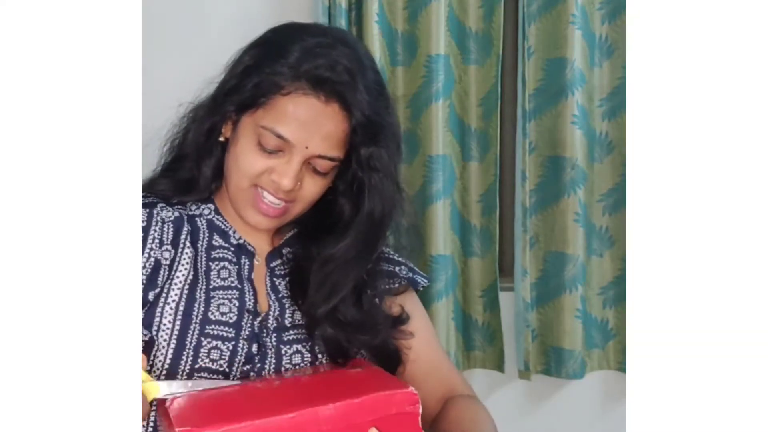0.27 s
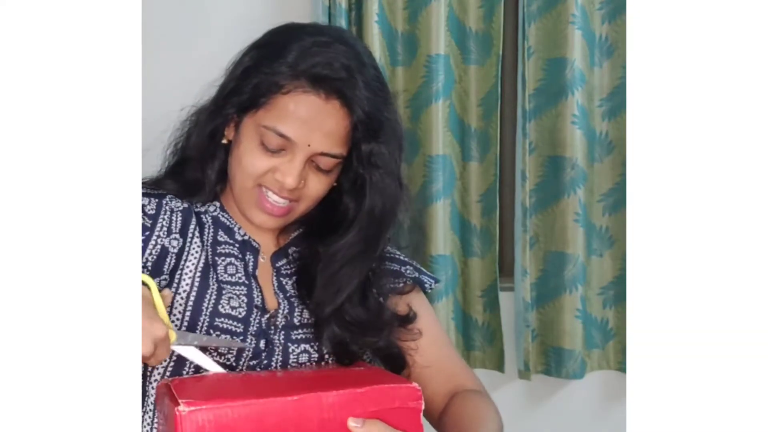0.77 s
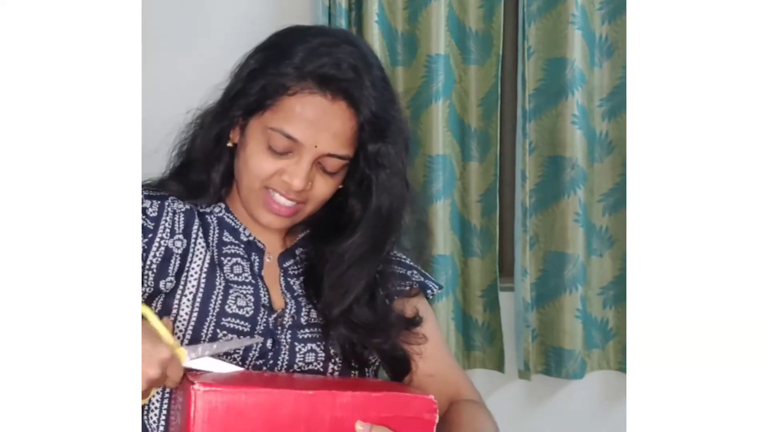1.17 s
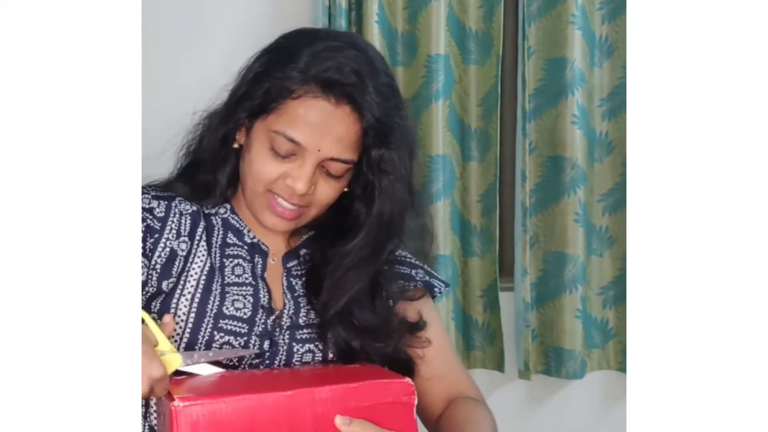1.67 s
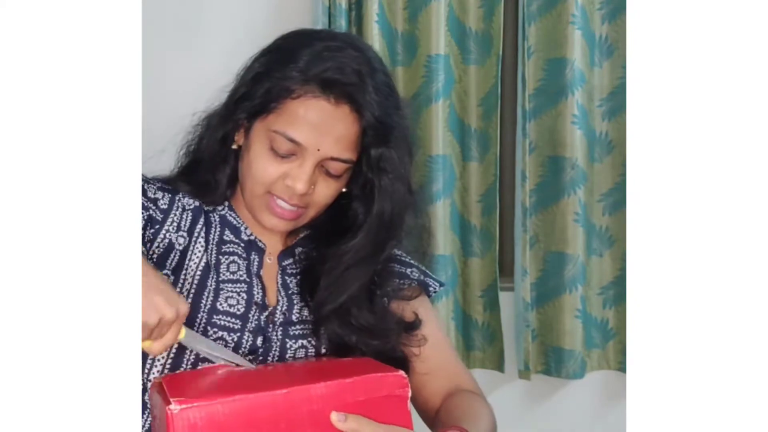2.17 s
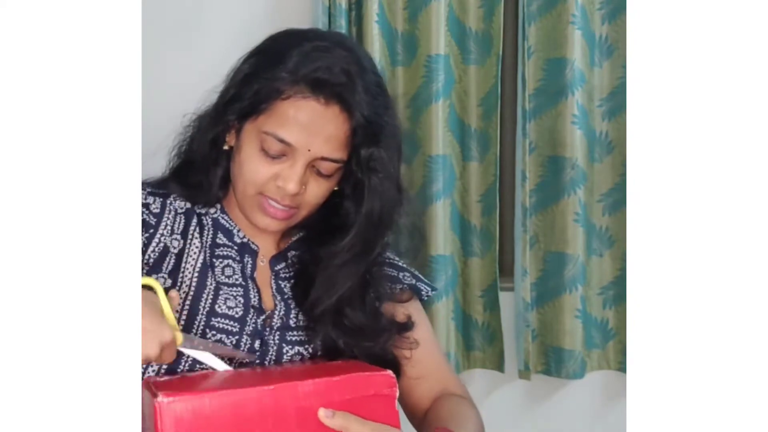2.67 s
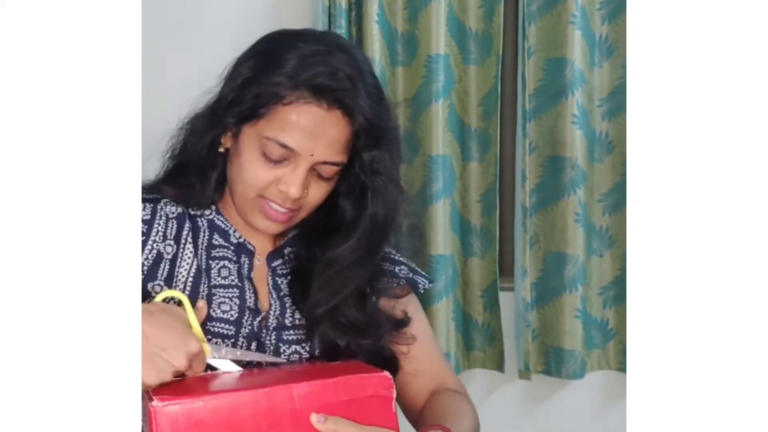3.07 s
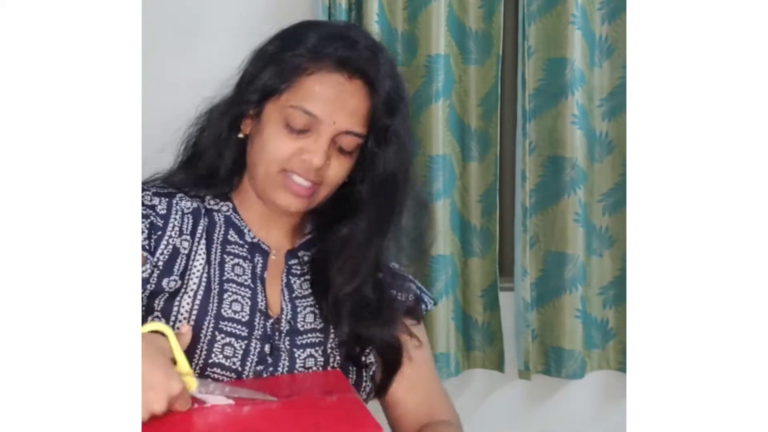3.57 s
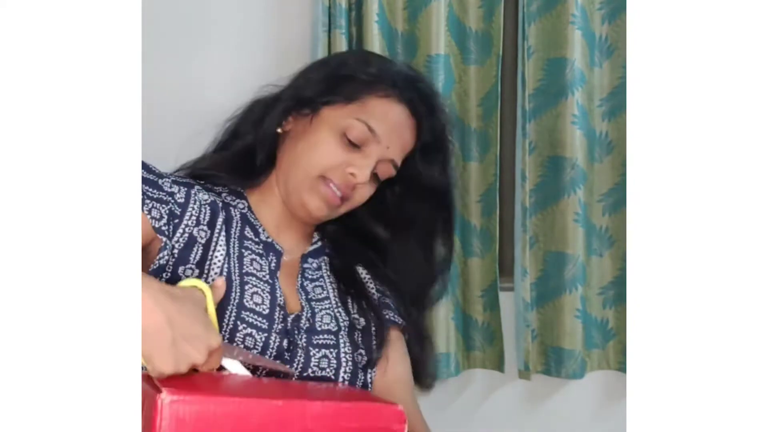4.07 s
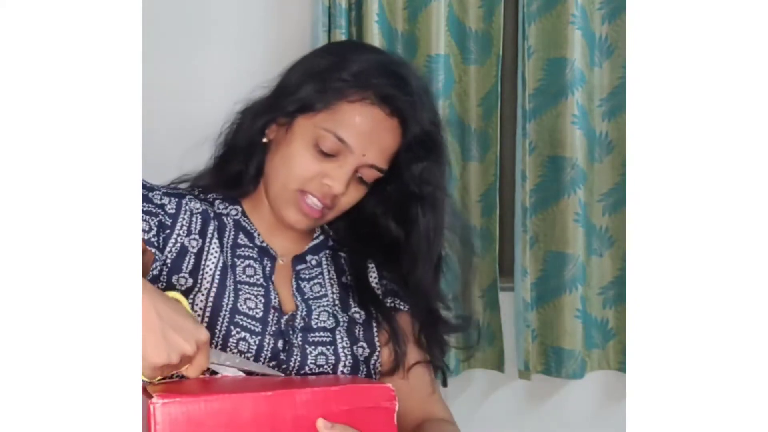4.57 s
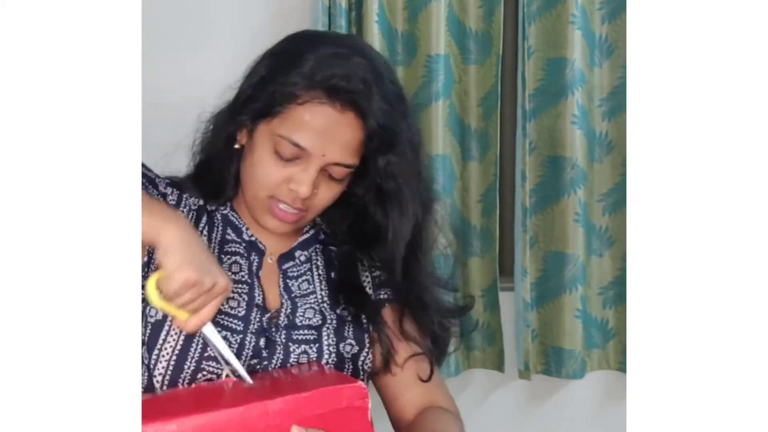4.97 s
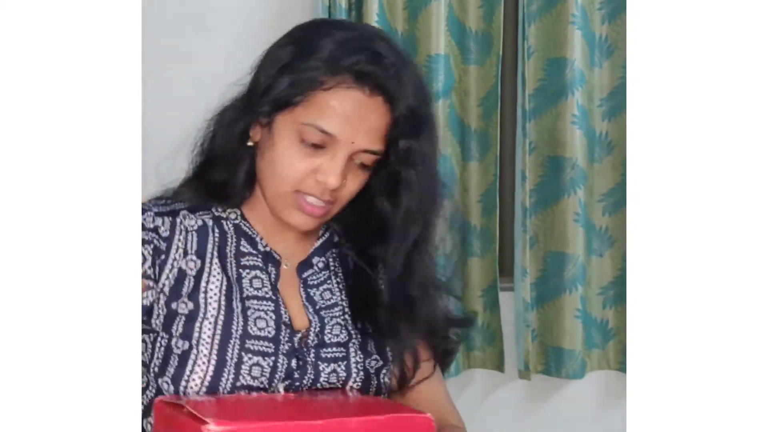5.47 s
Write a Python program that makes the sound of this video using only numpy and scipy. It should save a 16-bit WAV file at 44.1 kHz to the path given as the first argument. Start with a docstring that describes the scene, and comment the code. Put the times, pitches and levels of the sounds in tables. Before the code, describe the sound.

A faint, high buzz dies away as scissors begin cutting packing tape on a cardboard box close by. Short scrapes, tape snaps and hollow thuds come irregularly, with soft hand rubbing and faint low hums underneath. The shrill, insect-like buzz returns much louder and fades, and a final cluster of cuts ends with a sharp knock. The small room adds brief reflections and a low background hiss.

```python
"""Scissors cut the packing tape of a cardboard box in a small, hard-walled room.
A shrill, insect-like buzz dies away at the start. Until 3.3 s the blades scrape along the seam,
the tape snaps and the hollow box knocks under the cuts. At 3.5 s the buzz, fast pulses ringing a
small resonator, starts again and sinks away; the last cuts follow at 5.0-5.4 s.
Faint low hums come and go in the first 3.3 s; hands rub on the box over a steady rumble and hiss."""
import sys
import numpy as np
from scipy import signal
from scipy.fft import rfft, irfft
from scipy.io import wavfile
from scipy.ndimage import uniform_filter1d

SR = 44100
rng = np.random.default_rng(int(sys.argv[2]) if len(sys.argv) > 2 else 0)


def wav_out(sig):
    """Save sig, one row per channel (or a flat mono array), as 16-bit PCM at SR to the path in sys.argv[1]."""
    wavfile.write(sys.argv[1], SR, np.round(np.clip(np.atleast_2d(sig).T, -1, 1) * 32767).astype(np.int16))


N = 252693
TIME = np.arange(N) / SR


def cutting():
    """Snaps and strokes shake the hollow box, stiff lid and steel edge; each radiates into the room."""
    # Resonances of box and taped lid. Each row: frequency in Hz, width in Hz, relative level in dB.
    box_modes = [(125, 36, -5.5), (162, 31, 0.5), (219, 15, -2), (310.4, 45.4, 0.5), (348.6, 47, 1.5),
                 (410, 49.7, 2)]
    lid_modes = [(716, 82, -1.5), (820, 72, 3.5), (957, 178, -2), (1151, 154, 1.5), (1563, 240, -1),
                 (2107, 210, -10), (2573, 112, -9.5), (3970, 410, -15), (4860, 120, -28)]
    # Crack of tape on steel. Each row: frequency in Hz, relative spectral density in dB.
    edge_spectrum = [(1200, -30), (2500, 0), (4000, -1.5), (4900, 5), (6300, 4.5), (9000, -3), (12000, -5),
                     (16000, -8)]
    on_box, on_lid, on_edge = snaps() + strokes()
    box = room(through(cut(on_box, 63, "high"), resonances(box_modes)), wet_db=-2.0)
    lid = room(through(cut(on_lid, 220, "high"), resonances(lid_modes)), wet_db=-2.0)
    edge = room(through(on_edge, colour(edge_spectrum)), wet_db=-0.5)
    return box + lid + edge


def snaps(tear_s=0.0024, tear_db=-2.5, gain_db=29.0, rebound_s=0.008, rebound_db=-14, size=2048):
    """Force on box, lid and edge: fibres tear briefly, the box is released at once, the blade rebounds."""
    # Tape snaps and blade knocks. Each row: start in seconds, relative dB on box, lid and edge.
    events = [(0.331, -53, -58, -53.5), (0.400, -43.5, -45, -51), (0.428, -28, -41, -45),
              (0.564, -48, -55, -47), (0.598, -49, -53, -38.5), (0.612, -35.5, -39.5, -37),
              (0.836, -28.5, -25, -28), (1.130, -49, -66, -77), (1.335, -48, -62, -73),
              (2.023, -54, -61, -67), (2.280, -48.5, -52.5, -42), (2.477, -62, -47, -59),
              (2.676, -55, -46.5, -46.5), (2.853, -38.5, -39.5, -40.5), (3.093, -45, -51, -61),
              (4.999, -57, -56, -53.5), (5.046, -45, -46, -50.5), (5.096, -32, -37, -42.5),
              (5.233, -56, -59, -57), (5.345, -28, -55, -59), (5.385, -24.5, -24, -34.5)]
    force = np.zeros((3, N + size))
    t = TIME[:size]
    for start_s, *levels_db in events:
        for delay_s, loss_db in ((0, 0), (rebound_s * rng.uniform(.8, 1.2), rebound_db)):
            tear = unit_energy(rng.standard_normal(size) * np.sqrt(t) * np.exp(-t / tear_s))
            blow = (t == 0) + from_db(tear_db) * tear
            gains = from_db(np.array(levels_db) + gain_db + loss_db)
            at = round((start_s + delay_s) * SR)
            force[:, at:at + size] += gains[:, None] * np.array([blow, blow, tear])
    return force[:, :N]


def strokes(slips_per_s=1300, spread_db=3.0, rub_db=-5.5):
    """Force on box, lid and edge: the dragged blade sticks and slips in dense, uneven jerks."""
    # Pushes along the seam. Each row: peak time and swell/fade time in seconds, dB on box, lid and edge.
    pushes = [(0.43, 0.028, -34.5, -39.5, -58), (0.624, .025, -43, -43, -37),
              (0.861, 0.018, -34, -33.5, -47), (1.57, 0.14, -58.5, -68.5, -70),
              (1.825, .04, -56.5, -63.5, -61.5), (2.37, 0.028, -35.5, -40, -42),
              (2.47, 0.054, -48, -53.5, -54), (2.876, 0.018, -33.5, -47, -43),
              (3.205, 0.075, -37, -48, -48.5), (5.045, 0.047, -46, -49.5, -53),
              (5.122, 0.023, -39, -35, -44), (5.388, .03, -33, -38, -47)]
    sizes = from_db(spread_db * np.minimum(rng.exponential(1, N), 4)) * rng.choice([-1, 1], N)
    slips = rms_one(sizes * (rng.random(N) < slips_per_s / SR))
    friction = rms_one(slips + from_db(rub_db) * rng.standard_normal(N))
    push = np.zeros((3, N))
    for peak_s, swell_s, *levels_db in pushes:
        distance = np.abs(TIME - peak_s) / swell_s
        push += from_db(levels_db)[:, None] * np.exp(-np.minimum(distance, 20) ** 1.36)
    return push * friction


def buzz(top_db=-14.0, dulling=0.14, rough_ratio=1.022, flutter_db=1.58, throb_db=1.3):
    """Fast pulses ring a small shrill resonator; a weaker, rougher, faster train beats with them."""
    # Resonator. Each row: frequency in Hz, width in Hz, relative level in dB.
    body_modes = [(2290, 93, -14.5), (2789, 36, 1), (3100, 89, 2), (3420, 302, 3), (3890, 450, -6),
                  (3852, 64, -6)]
    # Overtones. Each row: frequency in Hz, relative spectral density in dB.
    top_spectrum = [(4800, -10.5), (5800, -4.5), (7500, 0.5), (8200, -4.5), (9100, -2.5), (9900, -16),
                    (15500, -22)]
    rate_hz, effort = buzz_course()
    clean = pulse_train(rate_hz, jitter=.003)
    rough = pulse_train(rate_hz * rough_ratio, jitter=.012) + from_db(-4) * rng.standard_normal(N)
    pulses = clean + from_db(-6) * rough
    drive = cut(cut(pulses, 1800, "high"), 1800, "high")
    ring = rms_one(through(drive, resonances(body_modes)))
    top = rms_one(through(pulses, colour(top_spectrum)))
    brightness = from_db(top_db) * (effort / effort.max()) ** dulling  # quieter is duller
    heard = rms_one(room(ring + brightness * top, wet_db=-3.5))
    return effort * from_db(flutter_db * drift(45) + throb_db * drift(14)) * heard


def buzz_course(attack_s=0.054, hold_s=0.18, sink_s=0.38, sink_db=25.5,
                release_at_s=1.2, release_db_per_s=68, sag_hz=10, sag_s=0.26):
    """Pulse rate and effort: a buzz swells, holds, sinks to a drone and dies while its rate sags."""
    # Each row: start in seconds, settled pulse rate in Hz, held level in dB.
    buzzes = [(-1.25, 335, -26), (3.5, 339, -27.5)]
    rate_hz, effort = np.zeros(N), np.zeros(N)
    for start_s, settled_hz, db in buzzes:
        age_s = np.maximum(TIME - start_s, 0)
        sunk_db = sink_db * (1 - np.exp(-np.maximum(age_s - hold_s, 0) / sink_s))
        released_db = release_db_per_s * np.maximum(age_s - release_at_s, 0)
        effort += np.minimum(age_s / attack_s, 1) ** 2 * from_db(db - sunk_db - released_db)
        rate_hz = np.where(age_s > 0, settled_hz + sag_hz * np.exp(-age_s / sag_s), rate_hz)
    return rate_hz, effort


def pulse_train(rate_hz, jitter):
    """Pulses with a slightly unsteady period, each shared between two samples; rms 1."""
    step = rate_hz * (1 + jitter * drift(140) + 0.00151 * drift(18)) / SR
    phase = np.cumsum(step)
    at = np.flatnonzero(np.diff(np.floor(phase)))
    overshoot = (phase[at + 1] % 1) / step[at]
    pulses = np.zeros(N)
    pulses[at], pulses[at + 1] = overshoot, 1 - overshoot
    return rms_one(pulses)


def handling(attack_s=0.096, release_s=0.37):
    """Gain of the hands rubbing on the box: each shift builds up, holds and ebbs."""
    # Each row: start and end of the shift in seconds, relative level in dB.
    shifts = [(-.1, 0.125, -51.5), (0.42, 0.954, -49), (2.32, 3.5, -48.5), (3.49, 3.81, -48),
              (5.05, 5.492, -51.5)]
    rub = np.zeros(N)
    for start_s, end_s, db in shifts:
        rise = np.clip((TIME - start_s) / attack_s, 0, 1)
        rub += from_db(db) * rise * np.exp(-np.maximum(TIME - end_s, 0) / release_s)
    return rub


def hums(fade_s=0.04, waver_db=1.1, wander=0.0117):
    """Soft low tones that swell, waver and stop."""
    # Each row: start and end in seconds, frequency in Hz, rms level in dB.
    tones = [(0.09, 0.392, 156.5, -54), (1.46, 1.997, 155.5, -49.5), (2.463, 2.957, 83.3, -51.5),
             (2.485, 2.826, 167.5, -46), (2.728, 3.25, 125, -48.5), (2.83, 2.915, 125, -32)]
    out = np.zeros(N)
    for start_s, end_s, hz, db in tones:
        pitch_hz = hz * (1 + wander * drift(6.96))
        gate = np.clip(np.minimum(TIME - start_s, end_s - TIME) / fade_s, 0, 1)
        amplitude = np.sqrt(2) * gate * from_db(db + waver_db * drift(16))
        out += amplitude * np.sin(2 * np.pi * np.cumsum(pitch_hz) / SR)
    return out


def background(rumble_db=-63.5, rush_db=-56.5, hiss_db=-64.0, rub_low_db=-1.5, rub_high_db=-7.5,
               rumble_hz=100, split_hz=550):
    """Steady deep rumble, low rush and soft hiss; the upper two swell as the hands rub on the box."""
    # Background noise. Each row: frequency in Hz, relative spectral density in dB.
    air_spectrum = [(25, -22), (55, -10), (105, -3.5), (155, 3.5), (215, -10), (390, -5.5), (640, -21.5),
                    (1250, -19), (2100, -24.5), (4000, -28.5), (6600, -31), (8500, -42), (11000, -44),
                    (16000, -43)]
    deep, low, high = (through(white, colour(air_spectrum)) for white in rng.standard_normal((3, N)))
    rumble = rms_one(cut(cut(deep, rumble_hz, "low"), rumble_hz, "low"))
    rush = rms_one(cut(cut(low, rumble_hz, "high"), split_hz, "low"))
    hiss = rms_one(cut(high, split_hz, "high"))
    rub = handling()
    rush_gain = np.hypot(from_db(rush_db), from_db(rub_low_db) * rub)
    hiss_gain = np.hypot(from_db(hiss_db), from_db(rub_high_db) * rub)
    return from_db(rumble_db) * rumble + rush_gain * rush + hiss_gain * hiss


def room(x, wet_db, t60_s=0.32, wall_cut_hz=8700, first_echo_s=0.0019,
         early_s=0.047, thinning_s=0.016, late_db=-7.0):
    """Direct sound, a cluster of strong reflections from the near walls, then a weaker dying tail."""
    t = TIME[:SR // 2]
    thicken = 1 - np.exp(-np.maximum(t / first_echo_s - 1, 0))
    decay = thicken * from_db(-60 * t / t60_s + late_db * np.clip((t - early_s) / thinning_s, 0, 1))
    spectrum = rfft(rng.standard_normal(len(t)) * decay)
    # Reflections from all sides favour no band; the walls absorb only the very top.
    echoes = irfft(spectrum / np.sqrt(uniform_filter1d(np.abs(spectrum) ** 2, size=45)), len(t))
    response = from_db(wet_db) * cut(unit_energy(echoes * thicken * (t < t60_s)), wall_cut_hz, "low")
    response[0] = 1
    return through(x, response / np.hypot(1, from_db(wet_db)))


def resonances(modes, size=8192):
    """Impulse response of damped modes in parallel, signs alternating."""
    t = TIME[:size]
    response = np.zeros(size)
    for k, (hz, width_hz, db) in enumerate(modes):
        envelope = from_db(db) * width_hz * np.exp(-np.pi * width_hz * t)
        response += (-1) ** k * envelope * np.sin(2 * np.pi * hz * t)
    return unit_energy(response)


def colour(points, size=8192):
    """Minimum-phase impulse response of the given spectral shape, rolling off below its first point."""
    hz, db = np.transpose(points)
    bins_hz = np.maximum(np.fft.rfftfreq(size, 1 / SR), 1)
    gain = from_db(np.interp(np.log(bins_hz), np.log(hz), db)) * np.minimum(bins_hz / hz[0], 1) ** 2
    cepstrum = irfft(np.log(gain))
    cepstrum[size // 2:] = 0
    return unit_energy(irfft(np.exp(2 * rfft(cepstrum))))


def drift(rate_hz):
    """Random wander of rms 1 with rate_hz new values a second."""
    knots = rng.standard_normal(8192)
    return rms_one(np.interp(TIME * rate_hz, np.arange(len(knots)), knots))


def cut(x, hz, kind):
    """Second-order low- or high-pass."""
    return signal.sosfilt(signal.butter(2, min(hz, .45 * SR), kind, fs=SR, output="sos"), x)


def through(x, response):
    """Convolve with an impulse response."""
    return signal.fftconvolve(x, response)[:N]


def unit_energy(x):
    """Scale to energy 1."""
    return x / np.sqrt(np.sum(x ** 2))


def rms_one(x):
    """Scale to rms 1."""
    return x / np.sqrt(np.mean(x ** 2) + 1e-20)


def from_db(db):
    """Decibels to gain."""
    return 10 ** (np.asarray(db) / 20)


def scene():
    """All sources at one microphone."""
    return (cutting() + buzz() + hums() + background())[None]


def record(dry, cutoff_hz=16100):
    """The microphone port hollows out a few narrow bands; the top is cut."""
    # Each row: centre in Hz, width in Hz, gain at the centre in dB.
    port_dips = [(2307, 314, -49), (2786, 67, -21), (3316, 110, -17), (4684, 320, -7.5), (5223, 660, -22)]
    for hz, width_hz, db in port_dips:
        dry = dry + (from_db(db) - 1) * signal.lfilter(*signal.iirpeak(hz, hz / width_hz, fs=SR), dry)
    return signal.sosfilt(signal.ellip(10, .2, 80, cutoff_hz, fs=SR, output="sos"), dry)


dry = scene()
out = record(dry)
wav_out(out)
```